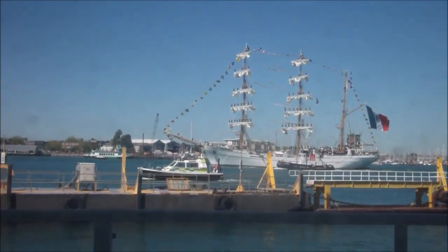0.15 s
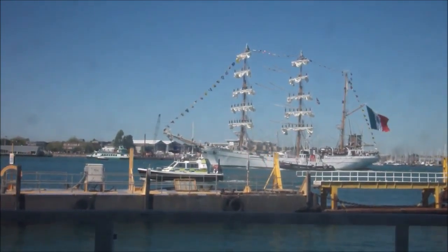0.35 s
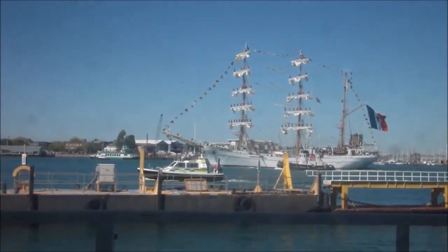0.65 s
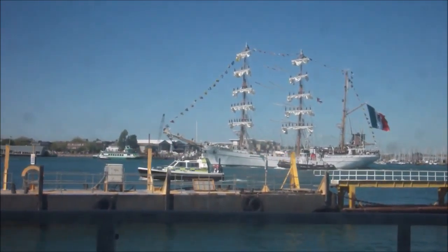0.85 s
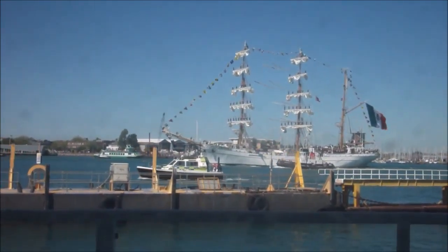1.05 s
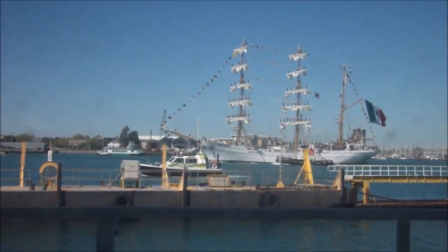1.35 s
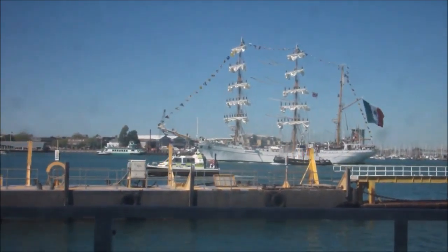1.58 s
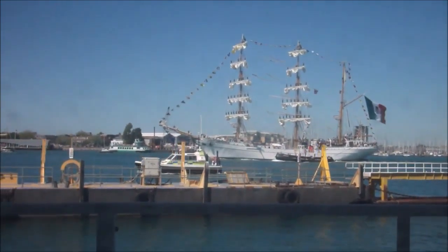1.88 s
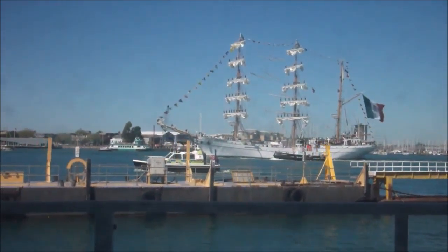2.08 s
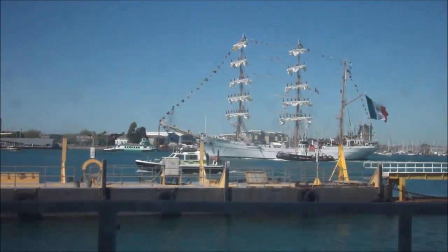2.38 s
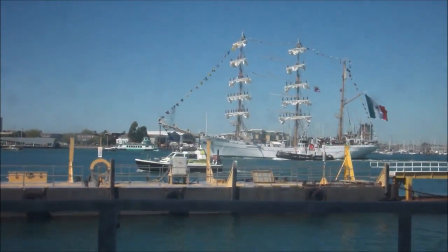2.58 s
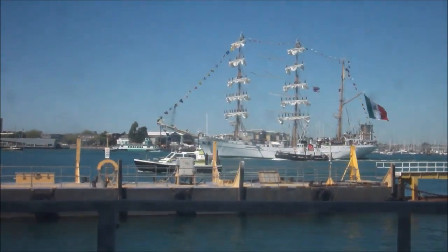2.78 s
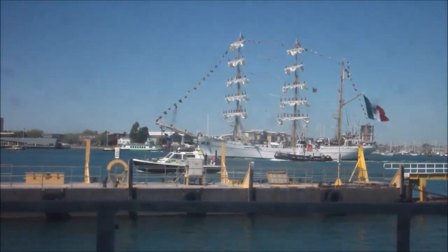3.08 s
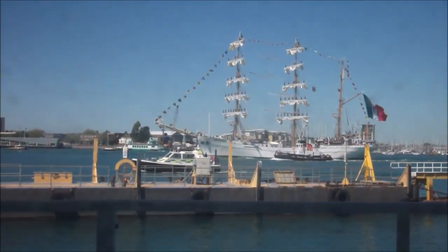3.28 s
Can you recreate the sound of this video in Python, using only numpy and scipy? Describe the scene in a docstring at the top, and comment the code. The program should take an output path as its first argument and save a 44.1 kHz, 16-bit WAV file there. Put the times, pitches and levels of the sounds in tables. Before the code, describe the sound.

Boat diesel engine rumbles low and steady, picking up slightly, over soft water and wind noise.

```python
"""A boat's diesel rumbles under the deck and gains a little speed; it is tones of one engine cycle plus noise.
A smaller engine and a few loose hums surge beside it, made of sines that waver in level and phase.
The hull pushes through harbour water in light wind that buffets the microphone: noise shaped by frequency.
A small motor buzzes faintly throughout, stronger from the middle on: overtones of one pitch.
Something squeaks far off: short sines. The camera's electronics add thin, high whines: sines, one with phase jumps."""
import sys
import numpy as np
from scipy import signal
from scipy.fft import rfft, irfft, next_fast_len
from scipy.io import wavfile
from scipy.ndimage import uniform_filter1d, map_coordinates

SR = 44100  # samples a second
rng = np.random.default_rng(int(sys.argv[2]) if len(sys.argv) > 2 else 0)


def file_out(sig):
    """Save sig as 16-bit WAV at sys.argv[1]."""
    # one column per channel
    cols = np.atleast_2d(sig).T
    # limit, then scale
    lim = np.clip(cols, -1, 1)
    pcm = np.round(lim * 32767).astype(np.int16)
    wavfile.write(sys.argv[1], SR, pcm)


N = 151263  # length in samples, about 3.43 s


def amp(db):
    """Turn decibels into a plain multiplier."""
    return 10 ** (np.asarray(db) / 20)


def unit(x):
    """Scale x to an rms (average strength) of 1."""
    return x / np.sqrt(np.mean(x ** 2) + 1e-20)


def curves(rows):
    """Join the points of a table with straight lines: one curve for each column after the time."""
    times_s, *columns = np.transpose(rows)
    return [np.interp(np.arange(N) / SR, times_s, column) for column in columns]


# The moments at which several tables below give their levels [t/s]
LEVEL_TIMES = (.4, 1.2, 1.9, 2.7)


def level_curve(levels_db):
    """Spread levels given at LEVEL_TIMES over every sample."""
    return curves(list(zip(LEVEL_TIMES, levels_db)))[0]


def wobble(rate):
    """A smooth random curve through `rate` random points a second."""
    points = rng.standard_normal(int(N * rate / SR) + 4)
    return map_coordinates(points, [np.arange(N) * rate / SR])


CYCLE_START_S = 2.916  # a moment at which the main engine's cycle starts over


def tone(hz, db, waver_db=0., waver_rad=0., locked=False):
    """An unsteady sine around rms level db; locked tones line up where the engine cycle starts over."""
    turns = np.cumsum(hz * np.ones(N)) / SR
    if locked:
        turns += .5 - turns[round(CYCLE_START_S * SR)]
    else:
        turns += rng.random()
    level = np.sqrt(2) * amp(db + waver_db * wobble(5.085))
    return level * np.sin(2 * np.pi * turns + waver_rad * wobble(3.9))


def filtered(x, response):
    """Multiply each frequency of x by response(frequency in Hz)."""
    size = next_fast_len(N + 8192)  # spare room so that the end does not wrap round to the start
    return irfft(rfft(x, size) * response(np.fft.rfftfreq(size, 1 / SR)), size)[..., :N]


# Narrow resonances of hull and deck [f/Hz, width/Hz, lift/dB]
HULL_RESONANCES = [(149, 24, 1.5), (187, 11, 2.5), (256, 11.5, 4), (300.3, 12, 3.5), (415.6, 33, 3.5),
                   (585.4, 8.2, 6.5), (706, 28, 3.5), (891, 61, 4), (1105, 60, 2.5), (1214, 10, 4)]


def hull_lift(hz):
    """Extra dB where hull and deck resonate: a bell-shaped bump for each resonance."""
    return sum(lift_db * np.exp(-.5 * ((hz - centre) / (width / 2)) ** 2)
               for centre, width, lift_db in HULL_RESONANCES)


def rush(spectrum, patchy_db):
    """Noise of rms 1, patchy in time and pitch, shaped by a spectrum and the hull's resonances."""
    grid = signal.stft(rng.standard_normal(N), nperseg=1024)[2]
    patches = uniform_filter1d(rng.standard_normal(grid.shape), size=10, axis=0)  # smooth across pitch
    patches = uniform_filter1d(patches, size=8, axis=1)  # smooth across time
    noise = signal.istft(grid * amp(patchy_db * unit(patches)), nperseg=1024)[1][:N]
    f, db = np.transpose(spectrum)

    def response(hz):
        shape_db = np.interp(np.log(hz + 1), np.log(f + 1), db)
        return amp(shape_db + hull_lift(hz))

    return unit(filtered(noise, response))


# Firing of the main engine: its rate and strength [t/s, f/Hz, level/dB]
FIRING_CURVE = [(0, 62, -20), (.4, 64.1, -19.5), (.65, 66.2, -22), (1, 67.6, -22), (1.5, 68.7, -21),
                (2.2, 68.9, -18), (2.7, 69.2, -14.5), (3.43, 69.6, -14.5)]
# Other tones of the engine cycle [multiple of cycle rate, then level/dB at each of LEVEL_TIMES]
CYCLE_TONES = [(3, -27, -22.5, -18.5, -23), (5, -32, -29, -23.5, -25.5), (8, -40, -37, -32, -44),
               (9, -34, -36, -44, -38), (22, -48, -41, -37.5, -36.5)]
# Colour of the hull and exhaust rumble, before the hull's lift [f/Hz, relative level/dB]
RUMBLE_COLOUR = [(7.1, -41.5), (12, -8), (44, -4.5), (67, -4.5), (86, -6), (105, -9), (130, -8), (171, -11),
                 (326, -24.5), (400, -27.5), (520, -46), (880, -120)]
# Strength of the rumble, before the fast shaking [t/s, level/dB]
RUMBLE_STRENGTH = [(0, -22.5), (.8, -21.5), (1.3, -23), (1.9, -21), (2.4, -20), (2.9, -20.5), (3.43, -22.5)]
CYLINDERS = 6  # firings in one engine cycle


def engine(shake_db):
    """Each cylinder fires once a cycle, so all tones are multiples of one cycle rate; noise adds the rumble."""
    firing_hz, firing_db = curves(FIRING_CURVE)
    tones = tone(firing_hz, firing_db, waver_db=1.4, waver_rad=.1, locked=True)
    cycle_hz = firing_hz / CYLINDERS
    for multiple, *levels_db in CYCLE_TONES:
        tones += tone(multiple * cycle_hz, level_curve(levels_db), waver_db=1.5, waver_rad=.11, locked=True)
    rumble_db, = curves(RUMBLE_STRENGTH)
    return tones + amp(rumble_db + shake_db) * rush(RUMBLE_COLOUR, patchy_db=1.5)


# Loose hums [f/Hz at the start, f/Hz at the end, then level/dB at each of LEVEL_TIMES]
LOOSE_HUMS = [(21.4, 22.5, -42, -30, -28, -25), (36, 36, -27, -34, -45, -45),
              (84.5, 86.5, -38, -33, -32, -31), (188.5, 187.5, -42, -39, -39, -44)]
# The smaller engine slows a little: its base pitch at the start and at the end [f/Hz]
SMALL_ENGINE_HZ = (50.4, 49.2)
# Tones of the smaller engine [multiple of base pitch, then level/dB at each of LEVEL_TIMES]
SMALL_ENGINE_TONES = [(1, -31, -27, -31, -37), (2, -36, -32, -34, -31.5), (3, -35, -36, -31.5, -35)]


def hums():
    """The smaller engine's tones and the loose hums: sines, most gliding in pitch, that surge and fade."""
    start_hz, end_hz = SMALL_ENGINE_HZ
    rows = list(LOOSE_HUMS)
    rows += [(multiple * start_hz, multiple * end_hz, *db) for multiple, *db in SMALL_ENGINE_TONES]
    return sum(tone(np.linspace(first_hz, last_hz, N), level_curve(db), waver_db=3, waver_rad=.6)
               for first_hz, last_hz, *db in rows)


# Colour of water and wind, before the hull's lift [f/Hz, relative level/dB]
WASH_COLOUR = [(120, -37.5), (200, -6), (290, -11.5), (420, -11.5), (680, -15.5), (900, -22.5),
               (1150, -21.5), (1550, -29), (1900, -29.5), (2150, -33), (2600, -37), (3500, -37.5),
               (5000, -44), (7300, -43.5), (8400, -47.5), (15000, -50), (15700, -55)]
# Strength of water and wind, before small wavers [t/s, level/dB]
WASH_STRENGTH = [(0.05, -32), (0.23, -34), (0.85, -32), (1.4, -32.5), (2.0, -32), (2.6, -32.5), (3.38, -32)]
# Colour of the wind on the microphone, before the hull's lift [f/Hz, relative level/dB]
BUFFET_COLOUR = [(12, -30), (20, 2), (45, -1), (62, -2), (80, -23), (120, -120)]
# Strength of the wind on the microphone [t/s, level/dB]
BUFFET_STRENGTH = [(0, -36.5), (1.2, -30), (2.1, -22.5), (3.43, -24)]


def wash(shake_db):
    """Water along the hull and light wind as broad noise, and the wind's buffeting as low noise."""
    wash_db, = curves(WASH_STRENGTH)
    buffet_db, = curves(BUFFET_STRENGTH)
    waver_db = 0.29 * shake_db + 0.32 * wobble(9.4)
    hiss = amp(wash_db + waver_db) * rush(WASH_COLOUR, patchy_db=0.65)
    return hiss + amp(buffet_db) * rush(BUFFET_COLOUR, patchy_db=1.5)


# Overtones of the small motor, before the buzz's rise and fall [multiple of buzz rate, level/dB]
BUZZ_OVERTONES = [(3, -48), (4, -50), (5, -50.5), (6, -51), (7, -52.5), (11, -66), (12, -63), (13, -63),
                  (15, -68), (17, -68), (19, -70), (20, -68)]
# How the buzz grows and eases, added to all its overtones [t/s, level/dB]
BUZZ_STRENGTH = [(0, -9), (1.35, -10), (1.7, 0), (2.5, 0), (3.43, -4)]
BUZZ_HZ = 142.2  # buzz rate


def motor():
    """A buzz made of multiples of one rate; each overtone wavers in level and phase on its own."""
    strength_db, = curves(BUZZ_STRENGTH)
    return sum(tone(multiple * BUZZ_HZ, db + strength_db, waver_db=4, waver_rad=.9)
               for multiple, db in BUZZ_OVERTONES)


# Faint squeaks [centre t/s, length/s, f/Hz, level/dB at the centre]
SQUEAK_LIST = [(.035, .025, 4110, -57), (.056, .025, 4150, -57), (.11, .03, 4100, -60),
               (.133, .02, 3950, -58), (.955, .02, 3660, -57), (.969, .022, 3790, -55),
               (1.004, .02, 3690, -57), (.967, .018, 1650, -48), (.967, .018, 1950, -50)]


def squeaks():
    """Short far-off whistles: sines that swell and fade, made slightly rough by a trembling pitch."""
    t = np.arange(N) / SR
    total = 0
    for centre_s, length_s, hz, db in SQUEAK_LIST:
        swell = np.exp(-.5 * ((t - centre_s) / (length_s / 3)) ** 2)
        total = total + swell * tone(hz * (1 + .012 * wobble(100)), db)
    return total


# Average pitch of the whine, phase jumps included [t/s, f/Hz]
WHINE_PITCH = [(0, 7453), (1.55, 7453), (1.62, 7450), (2.0, 7450), (2.3, 7443.5), (2.55, 7443.5),
               (2.62, 7441), (3.43, 7441)]
# Strength of the whine and of its octave [level/dB]
WHINE_LEVELS = (-58.5, -65)
# Almost steady thin tones, evenly spaced [multiple of the spacing, level/dB]
THIN_TONES = [(129, -81), (130, -79), (131, -75), (132, -67), (133, -67.5), (134, -76), (135, -79)]
FREE_HZ, RESYNC_HZ, JUMP_S = 7441.5, 29.6, .001  # whine between jumps, jumps a second, length of a jump
SPACING_HZ = 54.115  # gap between neighbouring thin tones


def electronics():
    """A free-running whine is shifted in phase at each resync, less and less; its octave and thin tones join."""
    mean_hz, = curves(WHINE_PITCH)
    since_resync = np.arange(N) * RESYNC_HZ / SR % 1  # 0 to 1 between two jumps
    lag = (mean_hz - FREE_HZ) / RESYNC_HZ * since_resync  # in turns; its drop at each resync is the jump
    turns = np.cumsum(mean_hz) / SR - uniform_filter1d(lag, size=round(JUMP_S * SR))
    whine = sum(np.sqrt(2) * amp(db) * np.sin(2 * np.pi * multiple * turns)
                for multiple, db in zip((1, 2), WHINE_LEVELS))
    return whine + sum(tone(multiple * SPACING_HZ, db, waver_db=.5) for multiple, db in THIN_TONES)


def scene():
    """Add all sources; rumble and wash share one fast random shaking, weaker in the wash."""
    shake_db = 1.22 * wobble(30)
    total = engine(shake_db) + hums() + wash(shake_db) + motor() + squeaks() + electronics()
    return total[None]  # one channel


TOP_HZ = 15750  # band limit


def record(dry):
    """The camera keeps nothing from its band limit upwards."""
    return filtered(dry, lambda hz: hz < TOP_HZ)


dry = scene()
out = record(dry)
file_out(out)
```